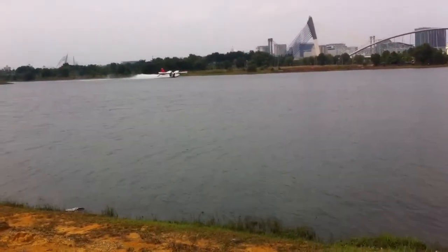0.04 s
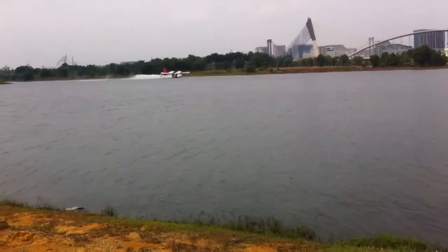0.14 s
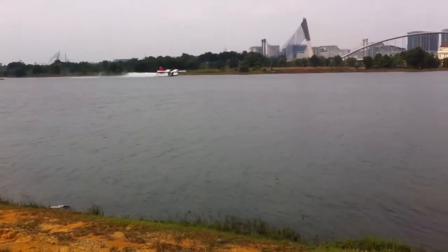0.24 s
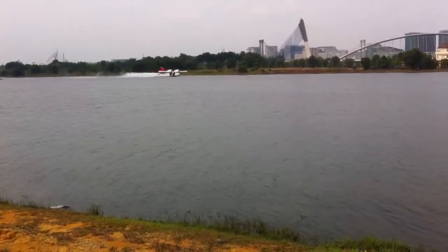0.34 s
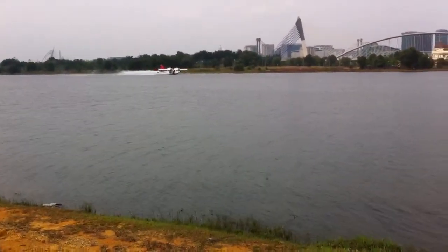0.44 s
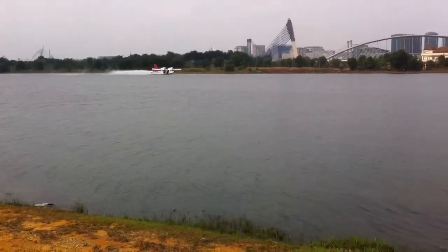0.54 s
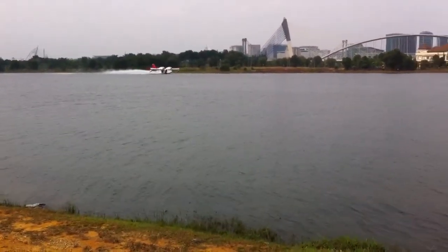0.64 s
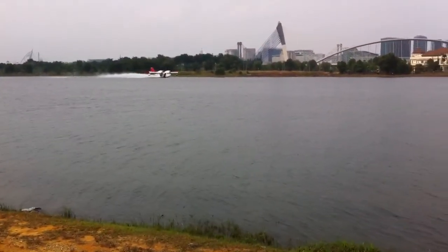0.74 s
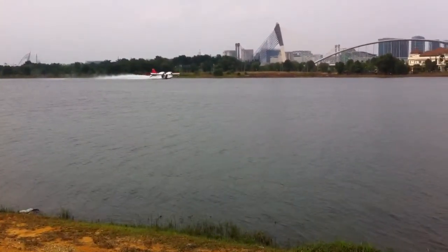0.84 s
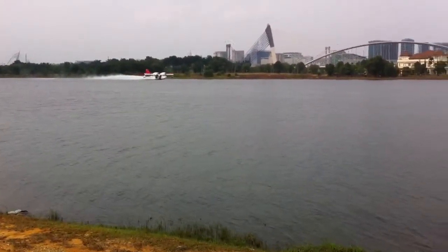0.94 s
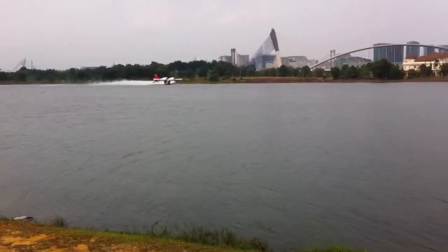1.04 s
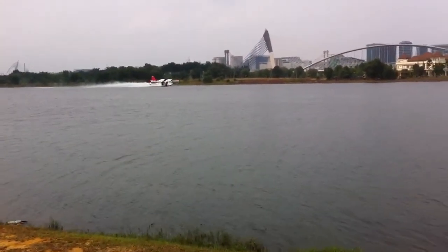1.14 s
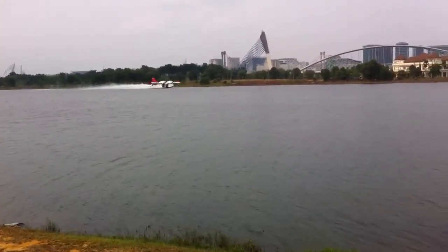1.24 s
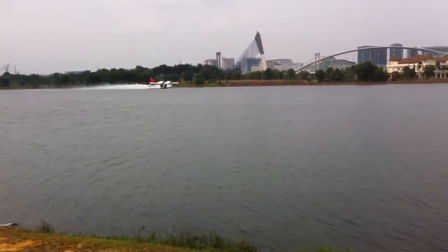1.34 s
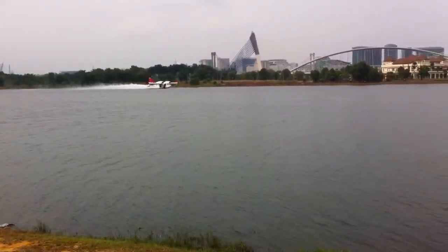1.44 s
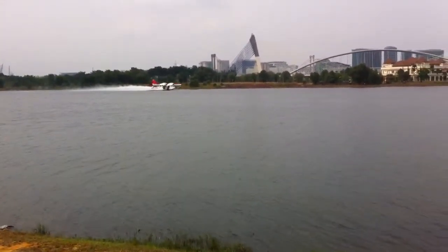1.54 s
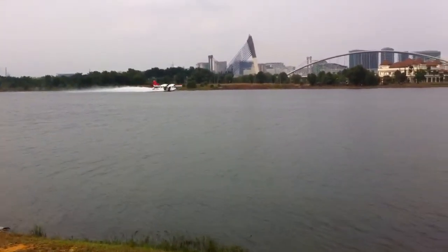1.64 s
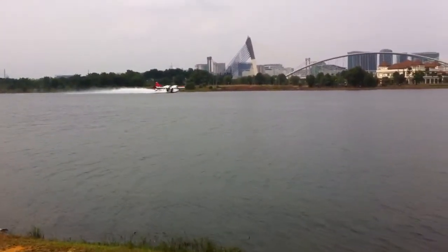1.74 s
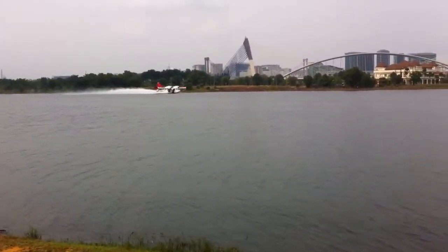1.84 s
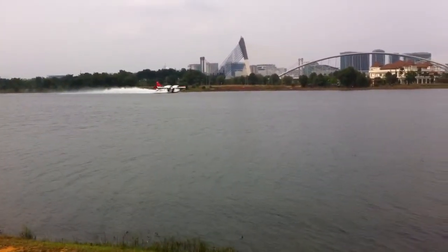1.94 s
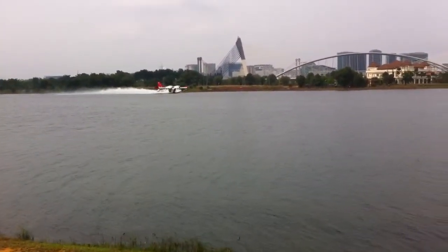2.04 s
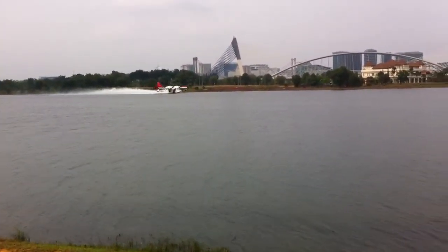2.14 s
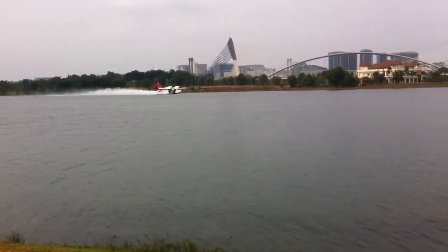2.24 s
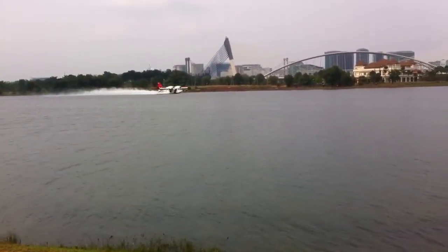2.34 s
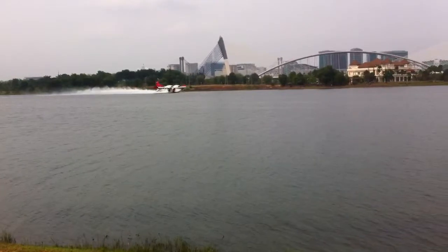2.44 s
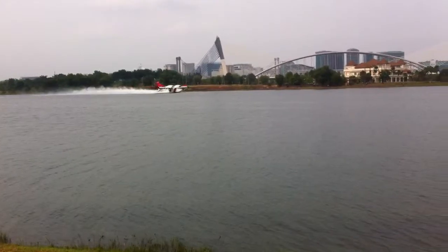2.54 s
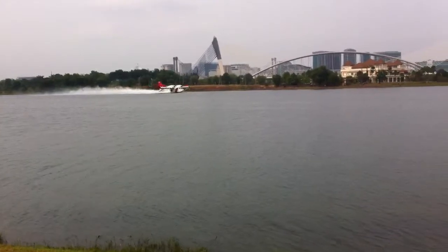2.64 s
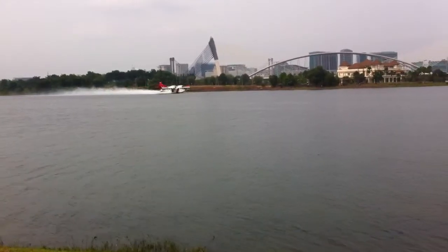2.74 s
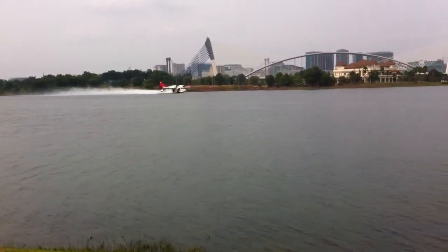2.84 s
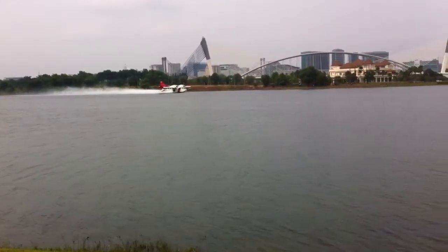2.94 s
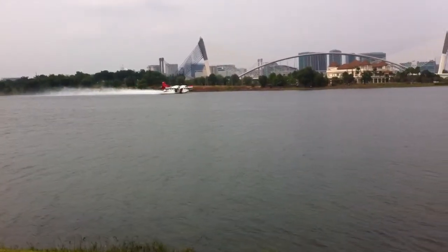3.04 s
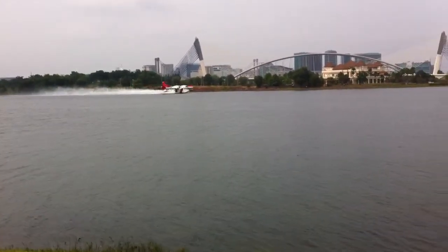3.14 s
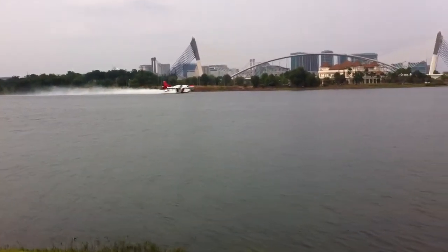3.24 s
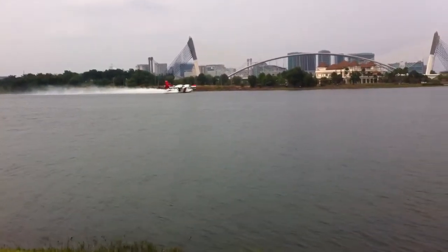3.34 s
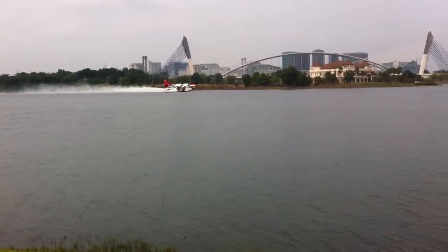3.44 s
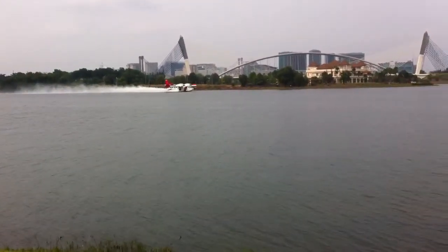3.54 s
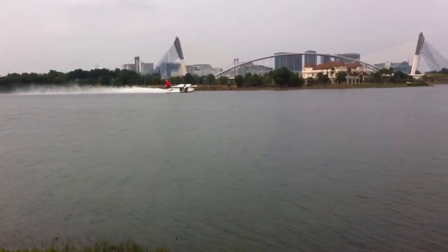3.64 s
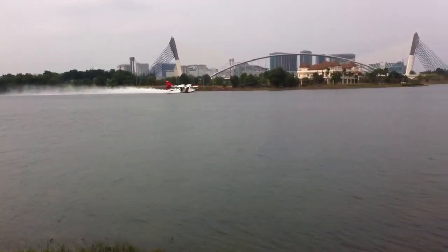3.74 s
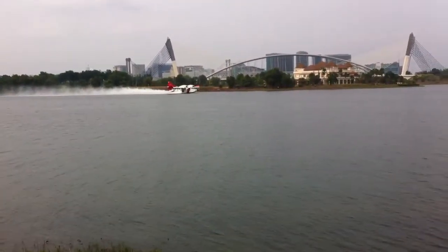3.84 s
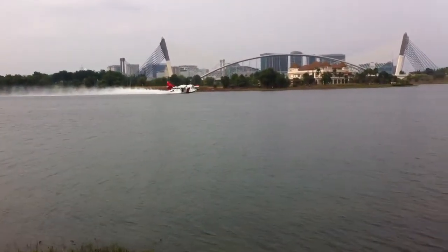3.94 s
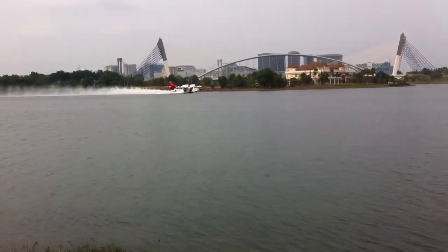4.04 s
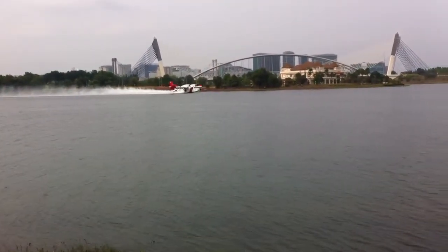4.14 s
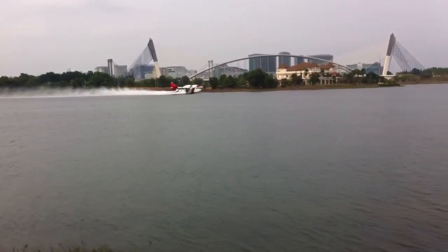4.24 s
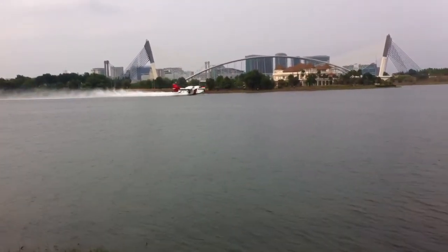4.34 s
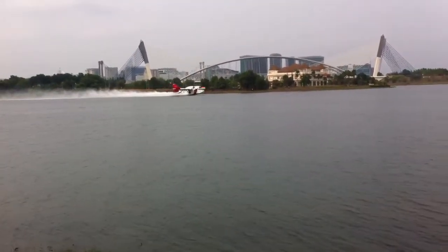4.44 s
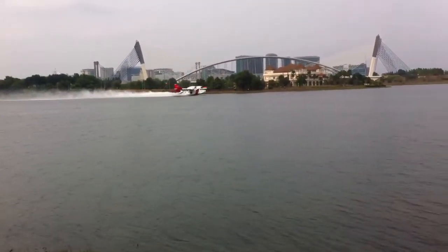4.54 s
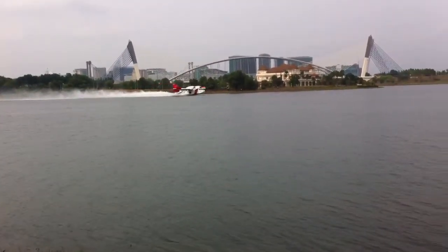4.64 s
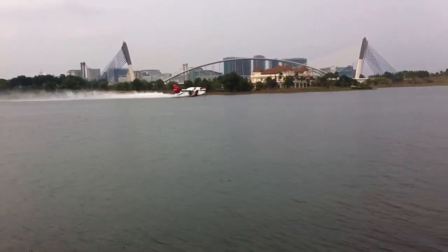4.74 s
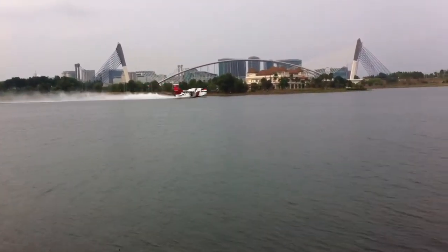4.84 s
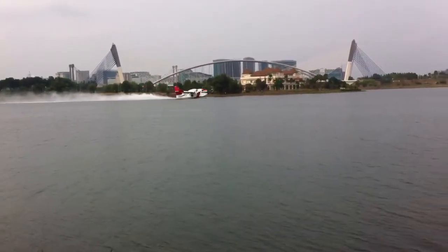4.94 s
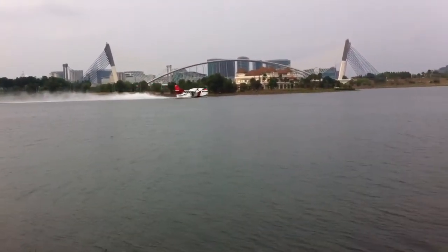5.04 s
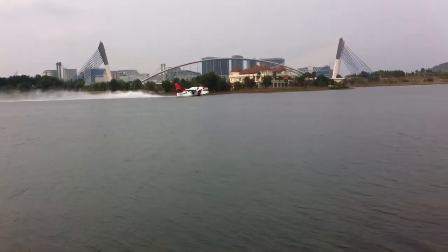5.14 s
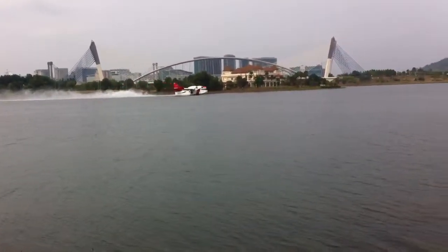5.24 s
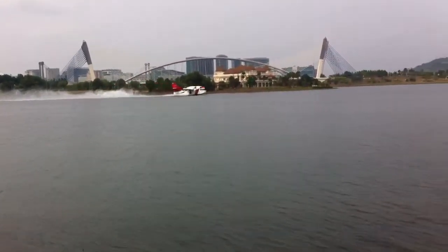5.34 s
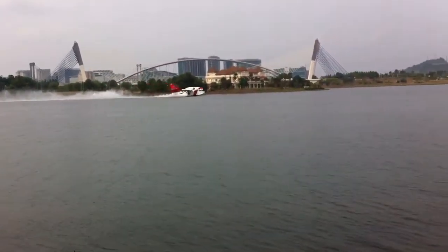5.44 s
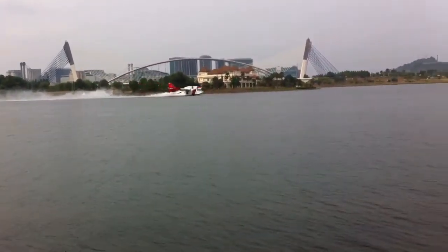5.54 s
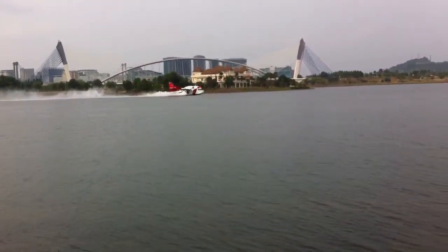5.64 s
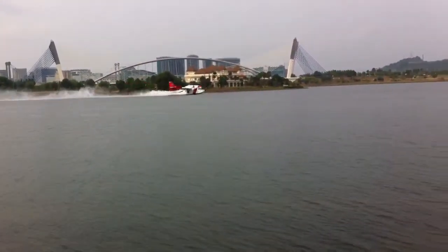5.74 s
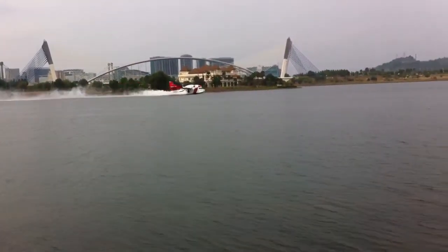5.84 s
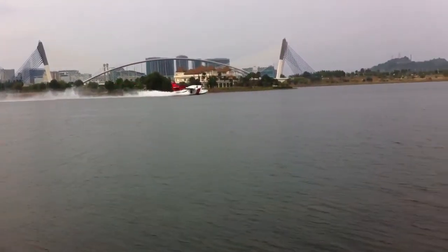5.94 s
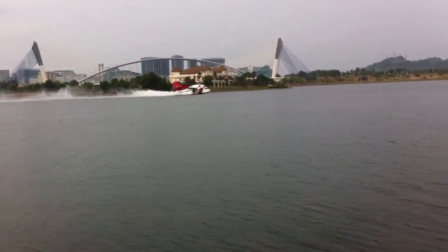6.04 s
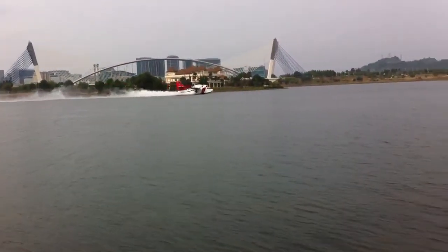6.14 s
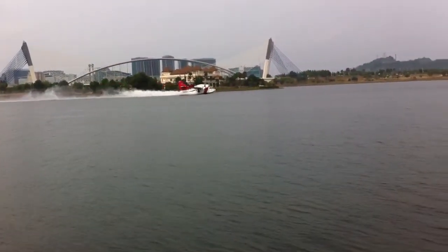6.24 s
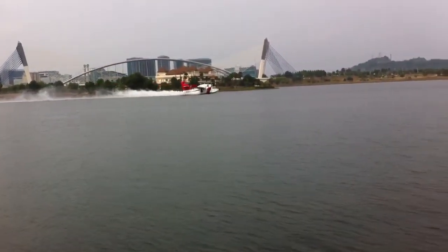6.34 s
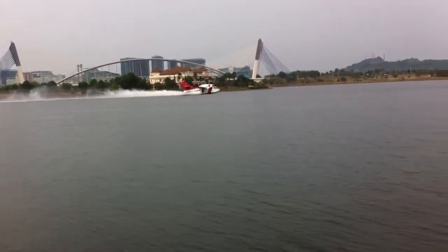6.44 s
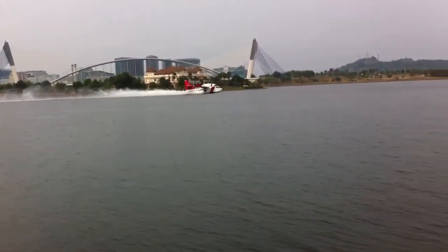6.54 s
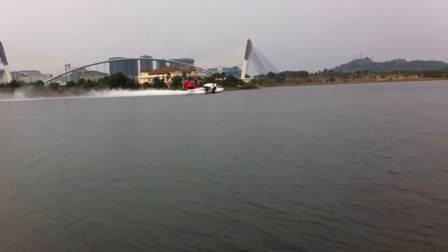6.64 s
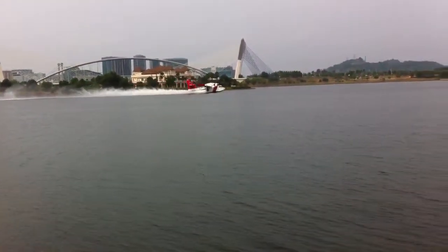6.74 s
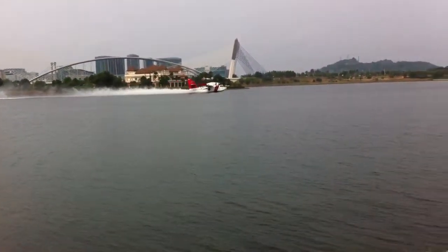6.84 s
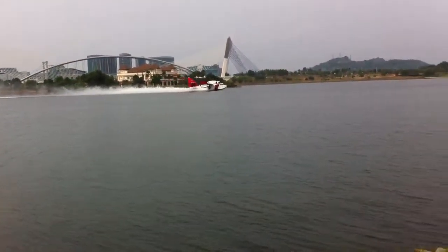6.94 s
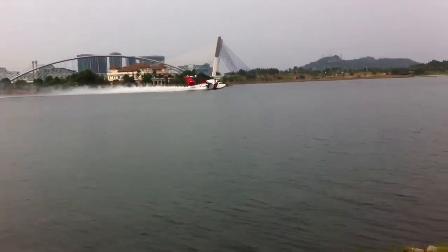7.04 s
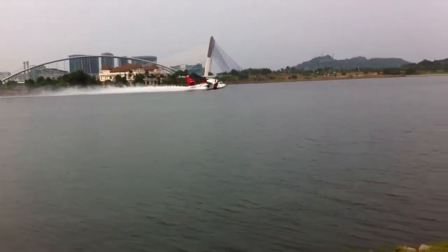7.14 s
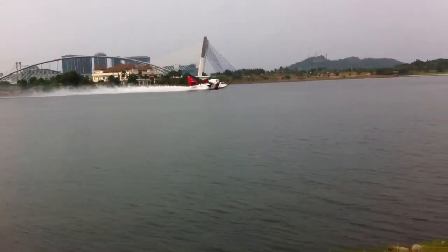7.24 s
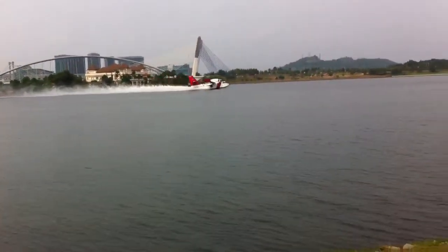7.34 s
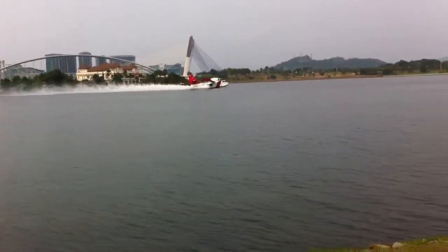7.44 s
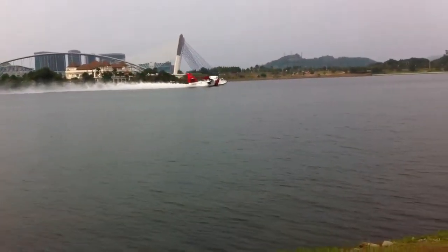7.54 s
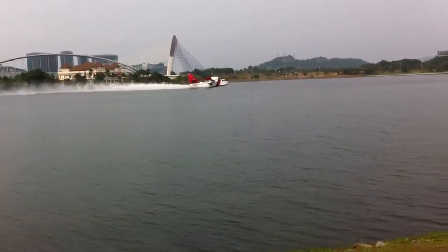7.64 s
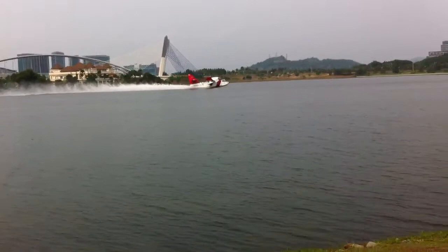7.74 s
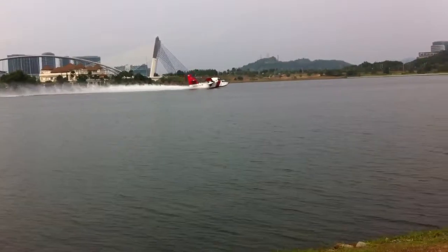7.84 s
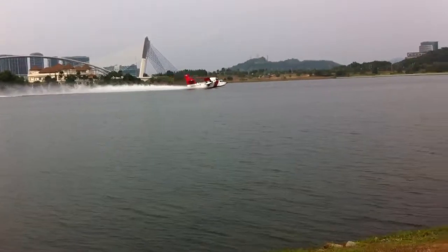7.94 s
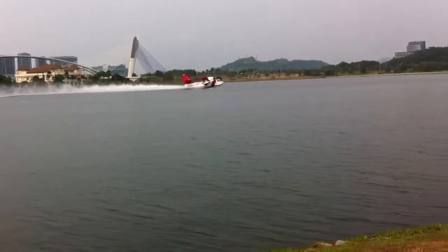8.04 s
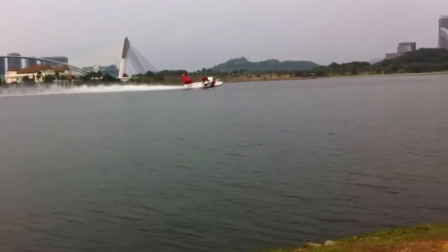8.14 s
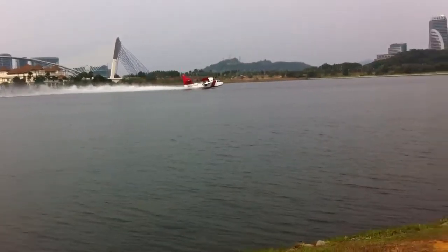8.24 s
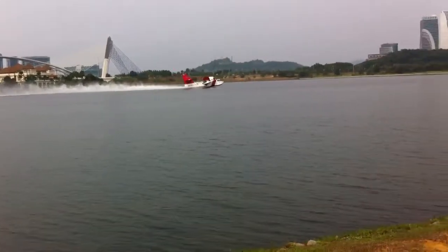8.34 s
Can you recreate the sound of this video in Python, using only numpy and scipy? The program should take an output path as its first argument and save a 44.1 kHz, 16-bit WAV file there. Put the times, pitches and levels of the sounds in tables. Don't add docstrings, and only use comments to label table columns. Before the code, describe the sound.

Faint shore rumble and rasping insects give way to a seaplane's growing propeller drone, airy roar, shimmering whine and fizzing spray.

```python
import sys
import numpy as np
from scipy import signal
from scipy.fft import rfft, irfft
from scipy.io import wavfile
from scipy.ndimage import uniform_filter1d

SR = 44100
rng = np.random.default_rng(int(sys.argv[2]) if len(sys.argv) > 2 else 0)


def invert_db(x):
    u = np.asarray(x, float) / 20
    return 10 ** u


def put_to_file(sound):
    columns = np.atleast_2d(sound).T
    safe = np.clip(columns, -1, 1)
    whole_steps = np.round(safe * 32767)
    wavfile.write(sys.argv[1], SR, whole_steps.astype(np.int16))


N = 369999

# [t/s, level/dB]
SHORE_LEVEL = [(0, -44), (.8, -47), (1.8, -49), (8.39, -55.5)]
# [f/Hz, level/dB per Hz]
RUMBLE_COLOUR = [(24, -67), (40, -44), (59, -20), (225, 0.5), (245, 3.5), (294, -23), (495, -24),
                 (875, -18.5), (2200, -21.5), (2860, -64.5), (4840, -120)]
# [t/s, f/Hz, level/dB]
MOTOR_HUM = [
    (0, 250.8, -43.5),
    (.8, 252.6, -48.5),
    (1.2, 252.7, -82),
]
# [f/Hz, level/dB per Hz]
INSECT_COLOUR = [(1900, -24), (2350, -1), (2600, 2.5), (2950, 2), (3350, 2), (3800, -2.5), (5500, -6),
                 (7000, -27.5)]
# [t/s, lift/dB]
INSECT_CHIRRS = [
    (.08, 4.2),
    (.3, 2.7),
    (.7, 3.2),
]
# [t/s, strength/0-1, extra delay/ms]
WATER_MIRROR = [(0, 0.5, 1.23), (3, 0.32, 1.43), (5, 0.46, 1.563), (6.5, 0.31, 1.615), (8.39, 0.28, 1.646)]
# [f/Hz, width/Hz, depth/0-1]
NEARBY_DIPS = [(596, 152, 0.57), (1239, 90, 0.75), (2387, 50, 0.6), (2734, 76, 1), (3950, 110, 0.25)]
# [f/Hz, level/dB per Hz]
BOOM_COLOUR = [(45, -28), (75, -21), (120, -2), (190, 6), (270, -5.5), (380, -6), (600, -20.5)]
# [f/Hz, level/dB per Hz]
ROAR_COLOUR = [(200, -49), (330, -1.5), (480, 1), (620, 0), (800, -4.5), (1050, -19.5), (1250, -8),
               (1700, -35)]
# [f/Hz, level/dB per Hz]
HISS_COLOUR = [(700, 4.5), (1400, 0), (2200, 1), (3500, -3), (5500, -7), (7000, -3.5), (8000, -11),
               (9600, -17.5), (10300, -39), (12000, -61)]
# [f/Hz, level/dB per Hz]
FIZZ_COLOUR = [(8500, -25.5), (10000, -3), (11200, -13.5), (12300, -21.5), (14000, -35)]
# [t/s, lift/dB]
EXHAUST_SURGES = [
    (2.2, 0.5),
    (3.55, 1),
    (4.7, 0.5),
    (6.73, 1),
]
# [t/s, lift/dB]
HULL_SLAPS = [(4.62, 8), (4.73, 6), (4.99, 7), (5.33, 7), (5.64, 8), (5.82, 5), (5.94, 5), (6.34, 4),
              (6.57, 4), (7.41, 3), (7.79, 5), (8.06, 3)]
# [t/s, level/dB]
FACING_SHORE = [(0, -61), (1.15, -56.5), (2.3, -52.5), (2.45, -50.5), (3.4, -49), (3.75, -46.5),
                (4.5, -47.5), (5.05, -41.5), (5.3, -40.5), (5.5, -35.5), (5.72, -37), (5.92, -35),
                (6.6, -37), (6.75, -39.5), (7.15, -38), (7.8, -37), (8.1, -40), (8.39, -44)]
# [f/Hz, level/dB per Hz]
INTAKE_COLOUR = [(4200, -1.5), (5500, -2), (6800, 3), (7600, -4), (8600, -22), (9500, -36)]
# [t/s, f/Hz, spread of side lines/Hz]
WHINE_PITCH = [(0, 6120, 68.3), (.8, 6410, 80.6), (1.4, 6650, 137), (1.8, 6900, 117), (2.05, 7120, 114),
               (2.6, 7350, 90), (3.7, 7410, 101), (4.7, 7360, 127), (5.6, 7300, 149), (6.5, 7182, 168),
               (7.3, 7290, 197), (8.0, 7066, 206), (8.39, 6950, 224)]
# [t/s, lift/dB]
WHINE_GLINTS = [(1.19, 6.5), (1.36, 8.5), (1.56, 4.7), (1.99, 6), (2.45, 1), (2.88, 1), (3.04, 3.5),
                (3.17, 3.5), (3.76, 3), (3.91, 3.5), (4.66, -3), (5.07, 6.5), (5.48, 10), (5.91, 7.0),
                (6.24, 3.5), (6.42, 4.5), (6.58, 2), (6.96, 7.5), (7.13, 7), (7.31, 4.2), (7.41, 6),
                (7.54, 9), (7.79, 10), (7.96, 4.8), (8.09, 8), (8.2, 4.5)]
# [t/s, f/Hz, level/dB]
TAKE_OFF_RUN = [(0, 72.56, -53.5), (1, 77.6, -49.5), (1.6, 82.57, -46.5), (2.1, 87.87, -44),
                (2.7, 84, -41.5), (3.4, 86.3, -39.5), (4.0, 85.03, -37), (4.6, 84.2, -38),
                (5.5, 83.94, -34.5), (6.0, 83.04, -33.5), (6.5, 82.76, -32.5), (7.2, 82.56, -32.5),
                (7.6, 81.7, -33.5), (8.1, 81.7, -33), (8.39, 80.16, -33.5)]
# [t/s, phase scatter at the blade rate/rad^2]
ROUGH_AIR = [(0, .1), (3.6, .04), (4.2, .015), (5.5, .008), (6.2, .004), (8.39, .002)]
# [middle t/s, harmonic number, length/s, level/dB]
IN_STEP = [(1.46, 1, 0.37, -53), (1.503, 2, 0.6, -37), (2.15, 1, 0.94, -36.9), (2.165, 2, 0.33, -34),
           (2.53, 2, 0.37, -31), (2.855, 1, 0.71, -44), (3.201, 2, 1.08, -35), (3.72, 1, 1.22, -40),
           (4.46, 1, 1.8, -42.5), (4.5, 2, 1.1, -27.2), (4.859, 3, 0.69, -34.5), (5.109, 2, 0.31, -29),
           (5.67, 2, 0.67, -29.5), (5.68, 5, 0.39, -32), (6.08, 1, 0.98, -36.4), (6.087, 4, 0.31, -34),
           (6.18, 5, 0.42, -38), (6.285, 2, 0.7, -20.6), (6.401, 3, 0.45, -38), (6.8, 4, 1.1, -35),
           (6.794, 5, 0.5, -30.5), (7.106, 3, 0.83, -29), (7.15, 5, 0.46, -33), (7.535, 2, 1.496, -14),
           (7.66, 4, 0.75, -31), (7.966, 5, 0.95, -33), (8.112, 1, 0.32, -45), (8.141, 3, 0.75, -26),
           (8.268, 4, 0.44, -31.5), (8.39, 2, 0.22, -22)]
# [t/s, harmonic number, dip/dB]
OUT_OF_STEP = [(1.67, 1, -11), (3.57, 2, -5), (5.3, 1, -4), (5.42, 2, -13), (5.78, 3, -16), (6.45, 1, -4),
               (6.5, 4, -4), (6.59, 2, -7), (6.7, 3, -8), (6.72, 1, -9), (7.87, 1, -9), (7.98, 4, -10)]
# [harmonic number, level against the roar/dB]
BETWEEN_SWELLS = [(1, -11.5), (2, -3), (3, -5.5), (4, -16), (5, -20)]
# [harmonic number, level against the roar/dB]
UPPER_HARMONICS = [(6, -10.5), (7, -24.5), (8, -18.5), (9, -12.5), (10, -15.5), (11, -22)]


def rms_one(x):
    return x / np.sqrt(np.mean(x ** 2) + 1e-20)


def in_time(rows):
    s, *columns = np.transpose(rows)
    return [np.interp(np.arange(N) / SR, s, column) for column in columns]


def phase_of(hz):
    return 2 * np.pi * np.cumsum(hz) / SR


def drift(rate_hz):
    r = np.exp(-80 * np.pi * rate_hz / SR)
    noise = rng.standard_normal(N // 40 + 2002)
    slow = signal.lfilter([1], [1, -2 * r, r * r], noise)[2000:]
    return np.interp(np.arange(N) / 40, np.arange(len(slow)), rms_one(slow))


def coloured(spectrum, patchy_db):
    hz = np.arange(N // 2 + 1) * SR / N + 1
    point_hz, point_db = np.transpose(spectrum)
    colour_db = np.interp(np.log(hz), np.log(point_hz), point_db)
    shaped = rfft(rng.standard_normal(N)) * invert_db(colour_db)
    place = 2 * np.log2(hz / 40)
    first = int(2 * np.log2(point_hz[0] / 40))
    last = int(2 * np.log2(point_hz[-1] / 40)) + 1
    out, together = 0, drift(4.6)
    for k in range(first, last + 1):
        share = np.clip(1 - abs(place - k), 0, 1)
        flicker_db = patchy_db * (0.62 * together + 0.81 * drift(27))
        out = out + irfft(shaped * share, N) * invert_db(flicker_db)
    return rms_one(out)


def humps(times, lengths, heights):
    t = np.arange(N) / SR
    out = 0
    for s, length, height in np.broadcast(times, lengths, heights):
        out = out + height * np.cos(np.pi * np.clip((t - s) / length, -.5, .5))
    return out


def lifts(rows, length_s):
    s, db = np.transpose(rows)
    return humps(s, length_s, db)


def shore():
    rumble_db, = in_time(SHORE_LEVEL)
    rumble = invert_db(rumble_db) * coloured(RUMBLE_COLOUR, patchy_db=0.0)
    quiet_s = np.maximum(np.arange(N) / SR - 0.84, 0)
    rasp_db = -52 - 3.5 * quiet_s + lifts(INSECT_CHIRRS, 0.32)
    rasp = invert_db(rasp_db) * coloured(INSECT_COLOUR, patchy_db=2.0)
    hz, hum_db = in_time(MOTOR_HUM)
    hum = invert_db(hum_db + 3.4 * drift(2.9)) * np.sin(phase_of(hz) + 0.59 * drift(3.7))
    return rumble + rasp + hum


def over_water(x):
    strength, delay_ms = in_time(WATER_MIRROR)
    delay_ms = delay_ms + .025 * drift(.8)
    late = np.interp(np.arange(N) - delay_ms * SR / 1000, np.arange(N), x)
    late = signal.filtfilt(*signal.butter(1, 3000, fs=SR), late)
    return x - strength * late


def dips(x):
    for hz, width_hz, depth in NEARBY_DIPS:
        r = np.exp(-np.pi * width_hz / SR)
        top = (1 - r * r) / 2 * np.array([1, 0, -1])
        bottom = [1, -2 * r * np.cos(2 * np.pi * hz / SR), r * r]
        x = x - depth * signal.lfilter(top, bottom, x)
    return x


def wash(blade, boom_db, roar_db, hiss_db, fizz_db):
    boom = invert_db(boom_db - 8.5) * coloured(BOOM_COLOUR, patchy_db=2.0)
    roar = invert_db(roar_db + 1.0) * coloured(ROAR_COLOUR, patchy_db=-0.45)
    roar = roar * (1 + 0.19 * np.cos(blade))
    hiss = invert_db(hiss_db + 1.47) * coloured(HISS_COLOUR, patchy_db=1.57)
    hiss = hiss * (1 + 0.11 * np.cos(blade + 1.6))
    fizz = invert_db(fizz_db - 2.0) * coloured(FIZZ_COLOUR, patchy_db=0.5)
    return boom + over_water(roar + hiss) + fizz


def intake(whine_db):
    swell_db = uniform_filter1d(whine_db, size=SR // 8)
    return invert_db(swell_db - 6.5) * coloured(INTAKE_COLOUR, patchy_db=1.0)


def compressors(blade, whine_db):
    hz, spread_hz = in_time(WHINE_PITCH)
    carrier, out = phase_of(hz), 0
    for m in range(-7, 6):
        lean = 1.5 if m < 0 else 1
        weight = np.exp(-.5 * (m * 83 / (lean * spread_hz)) ** 2) / np.sqrt(spread_hz)
        twinkle = drift(10.3) + 1j * drift(14) + 0.58 * (drift(60) + 1j * drift(85))
        out = out + weight * (twinkle * np.exp(1j * (carrier + m * blade))).real
    return invert_db(whine_db - 0.5) * rms_one(out)


def harmonic_levels(roar_db):
    s, harmonic, length, db = np.transpose(IN_STEP)
    out = []
    for k, rest_db in BETWEEN_SWELLS:
        own = np.round(harmonic) == round(k)
        swell = humps(s[own], length[own], invert_db(db[own]))
        rest = invert_db(roar_db + rest_db + 2.5 * drift(2.5))
        level_db = 20 * np.log10(np.hypot(swell, rest))
        for at, n, dip_db in OUT_OF_STEP:
            if round(n) == round(k):
                level_db = level_db + humps(at, 0.16, dip_db)
        out.append(level_db)
    return out


def propellers(blade, levels_db, roar_db):
    scatter, = in_time(ROUGH_AIR)
    out = 0
    for k, db in enumerate(levels_db, 1):
        clean = np.exp(-scatter * (k ** 2 - .8))
        halo = (drift(11) + 1j * drift(11)) / np.sqrt(2)
        line = np.sqrt(clean) + np.sqrt(1 - clean) * halo
        out = out + np.sqrt(2) * invert_db(db) * (line * np.exp(1j * k * (blade + 1))).real
    for k, db in UPPER_HARMONICS:
        slipping = drift(5) + 1j * drift(5)
        tone = (slipping * np.exp(1j * round(k) * blade)).real
        near_db = roar_db + 35.0
        out = out + invert_db(roar_db + near_db + db) * tone
    return out


def scene():
    blade_hz, roar_db = in_time(TAKE_OFF_RUN)
    facing_db, = in_time(FACING_SHORE)
    blade_hz = uniform_filter1d(blade_hz, size=SR // 3)
    blade = phase_of(blade_hz)
    glints_db = lifts(WHINE_GLINTS, 0.13)
    spool_db = 0.37 * np.minimum(blade_hz - 84, 0)
    boom_db = -24 + 0.56 * (roar_db + 40) + spool_db + lifts(EXHAUST_SURGES, 0.2)
    whine_db = -46.5 + 0.54 * (facing_db + 41) + glints_db + 1.5 * drift(28)
    plume_db = humps(5.2, 1.8, 5)
    fizz_db = -75.5 + 1.5 * (facing_db + 42.5) + lifts(HULL_SLAPS, 0.063) + plume_db
    hiss_db = facing_db + 0.051 * glints_db
    around = shore()
    rush = dips(wash(blade, boom_db, roar_db, hiss_db, fizz_db)) + intake(whine_db)
    whine = compressors(blade, whine_db)
    drone = propellers(blade, harmonic_levels(roar_db), roar_db)
    return (around + rush + whine + drone)[None]


def roll_off(x):
    return signal.sosfilt(signal.butter(12, 15770, fs=SR, output="sos"), x)


def record(dry):
    scene_db = 10 * np.log10(uniform_filter1d(dry ** 2, size=SR) + 1e-12)
    hiss_db = -70.5 - .15 * (scene_db + 35)
    hiss = invert_db(hiss_db) * rng.standard_normal(dry.shape)
    tone = np.sqrt(2) * invert_db(-92) * np.sin(2 * np.pi * 15000 * np.arange(N) / SR)
    fade = np.clip((N - np.arange(N)) / (.004 * SR), 0, 1)
    return roll_off((dry + hiss + tone) * fade)


dry = scene()
out = record(dry)
put_to_file(out)
```